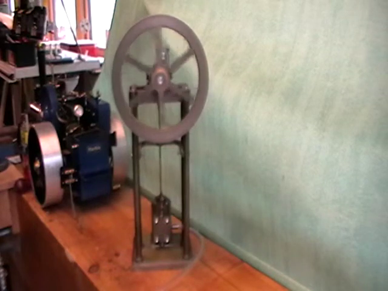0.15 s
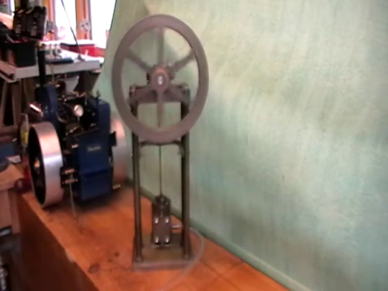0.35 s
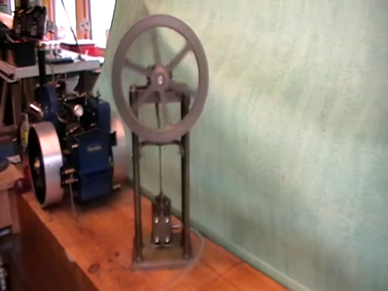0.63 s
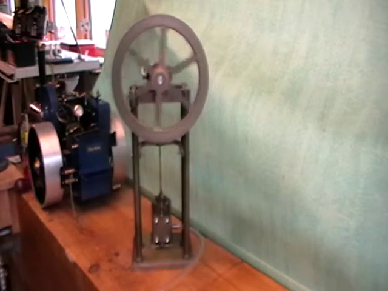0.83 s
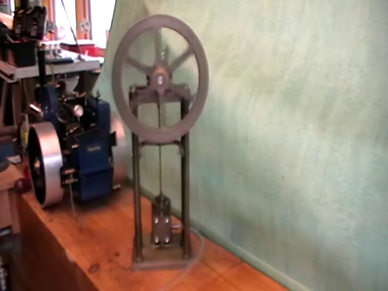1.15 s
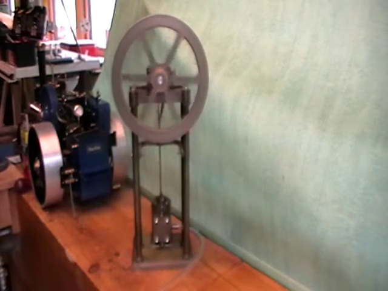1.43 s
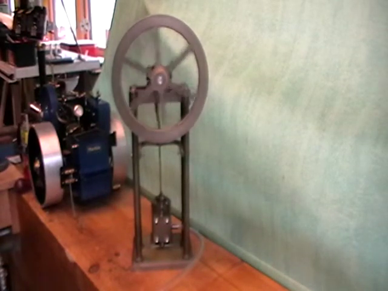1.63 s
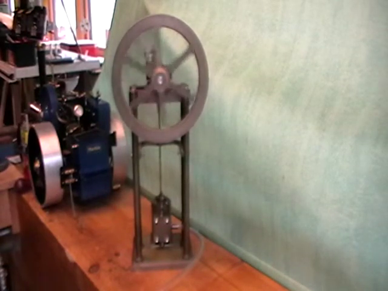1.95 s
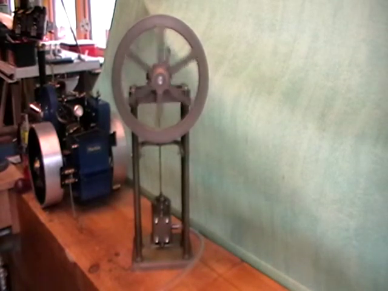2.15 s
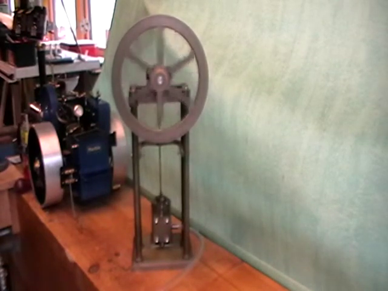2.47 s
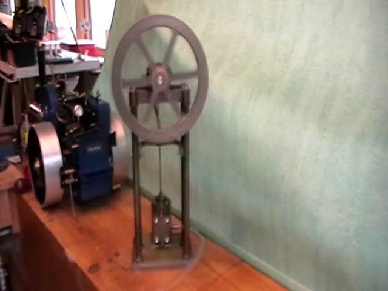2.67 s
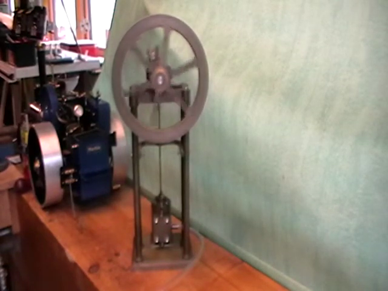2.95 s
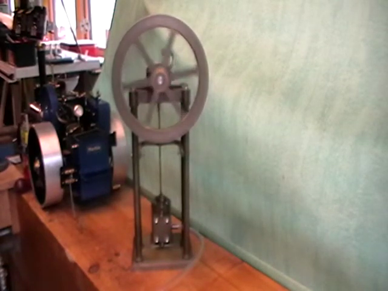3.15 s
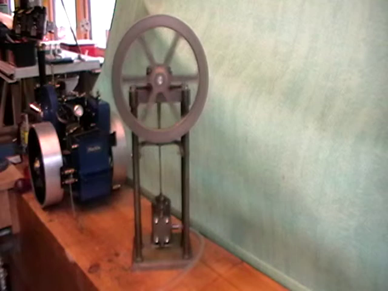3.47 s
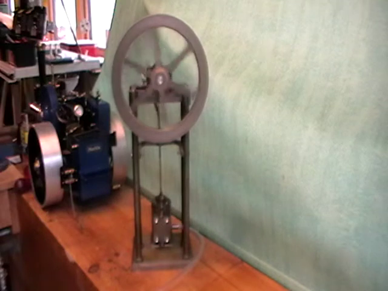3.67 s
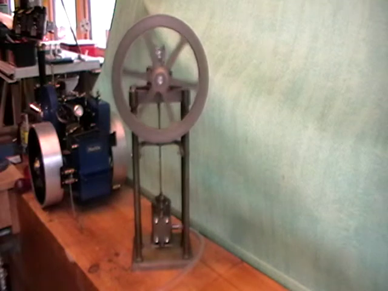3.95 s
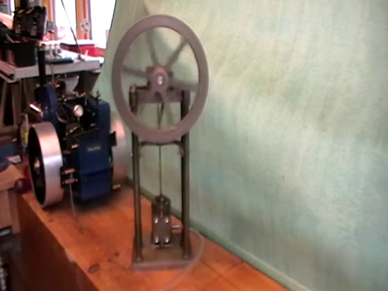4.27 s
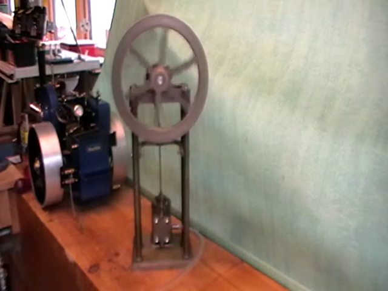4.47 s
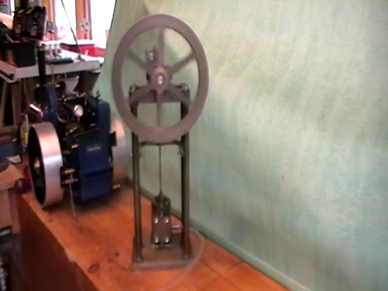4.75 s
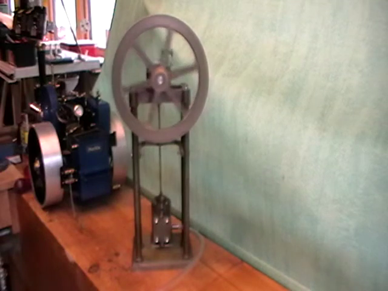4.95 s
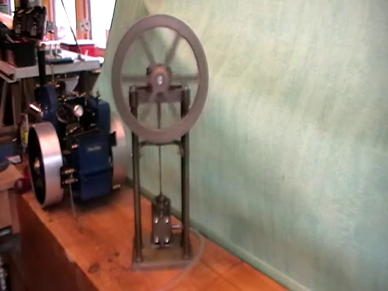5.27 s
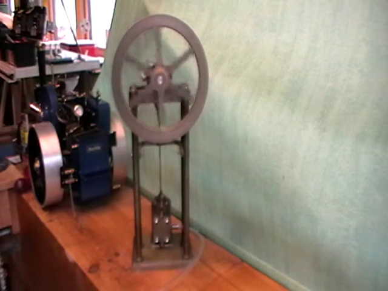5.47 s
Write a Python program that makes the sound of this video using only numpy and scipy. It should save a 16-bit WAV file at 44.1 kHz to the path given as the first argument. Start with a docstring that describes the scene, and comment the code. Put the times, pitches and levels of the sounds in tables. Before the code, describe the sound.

A small vertical flywheel engine runs on compressed air on a wooden bench, about one turn a second. Bright hiss swells and dips in two differing strokes, with a knock at each end. Just after one second a hard object clatters loudly and settles quickly; then only the engine continues. Close stereo microphone, small fairly dry workshop.

```python
"""A small vertical model steam engine turns about once a second on compressed air, on a workshop bench.
Its hiss is shaped noise gated by crank angle, one port per stroke; the exhaust pipe is resonant noise.
The slack rod bearing knocks near both dead centres, exciting decaying modes and noise bursts.
Flywheel bearings rumble and moan, the bench hums, the slide valve scrapes and the crosshead rubs.
Once, a hard object clatters loudly nearby: a series of blows, each with a rebound."""
import sys
import numpy as np
from scipy import signal
from scipy.fft import rfft, irfft, next_fast_len
from scipy.io import wavfile
from scipy.ndimage import map_coordinates

SR = 44100
rng = np.random.default_rng(int(sys.argv[2]) if len(sys.argv) > 2 else 0)


def wrap_up_sound(samples):
    """Save the sound to the file named by the first command line argument, as 16-bit audio."""
    columns = np.atleast_2d(samples).T
    # keep every value between -1 and 1, then stretch to whole-number steps
    tamed = np.clip(columns, -1, 1)
    steps = np.round(tamed * 32767).astype(np.int16)
    wavfile.write(sys.argv[1], SR, steps)


N = 247401

# Decibel columns are relative: the sources add their own gains.
# Dead centres of the crank, top and bottom in turn, half a revolution apart: time_s
DEAD_CENTRE_TIMES = [-.8, -.34, .211, .665, 1.2, 1.659, 2.192, 2.623, 3.135, 3.565, 4.054, 4.472, 4.953,
                     5.36, 5.85]
# Air flow through the up-stroke port over one revolution from top dead centre: turn, level_db
UP_PORT_FLOW = [(0, 0), (.05, 0.5), (.12, 2), (.27, 1.5), (.42, -0.5), (.48, -2), (.55, -19), (.7, -44),
                (.87, -21), (.9, -5.5), (.92, 2.5), (.96, 1.5)]
# Air flow through the down-stroke port: turn, level_db
DOWN_PORT_FLOW = [(.1, -20), (.47, -34), (.51, 0), (.56, -2), (.63, 1), (.67, -1.5), (.73, -8), (.8, -14.5),
                  (.87, -4), (.95, -21)]
# Air flow through the exhaust pipe: turn, level_db
EXHAUST_FLOW = [(0, -9), (.05, -11), (.12, -2.5), (.38, 0), (.42, -7), (.47, 4.5), (.52, -3.5), (.65, 0),
                (.76, -6), (.84, -10.5), (.875, 2), (.93, 3), (.97, -24)]
# Broad spectrum of the up-stroke hiss: frequency_hz, density_db
UP_HISS_SPECTRUM = [(200, -21), (700, -11), (1450, -12.5), (2000, -6.5), (3100, -5.5), (3950, -6),
                    (4900, 0.5), (7200, -1.5), (8200, 1.5), (9900, -2.5), (11700, -2.5), (12050, -4),
                    (13000, -6.5), (15000, -17)]
# Broad spectrum of the down-stroke hiss: frequency_hz, density_db
DOWN_HISS_SPECTRUM = [(300, -14), (750, -9.5), (1400, -13), (2700, -8.5), (4000, -10.5), (5500, -8),
                      (7200, -9), (8600, -1.5), (9300, -2), (10400, -5.5), (11500, -2), (12100, -17),
                      (13200, -21), (15000, -29)]
# Broad spectrum of the gland leak: frequency_hz, density_db
LEAK_SPECTRUM = [(700, -12), (1500, -21.5), (2000, -6), (3400, -5), (3950, -12), (5500, 0.5), (7200, -3),
                 (8100, 1), (9500, -4.5), (12300, -8.5), (13200, 0), (14000, -10.5), (15000, -7.5),
                 (15700, -30)]
# Resonances of the up-stroke port: centre_hz, width_hz, level_db
UP_PORT_RESONANCES = [(8260, 630, -4), (10400, 440, 0.5)]
# Resonances of the down-stroke port: centre_hz, width_hz, level_db
DOWN_PORT_RESONANCES = [(6450, 560, 0), (8600, 400, -7)]
# Resonances of the exhaust pipe: centre_hz, width_hz, level_db
PIPE_RESONANCES = [(2229, 52, 11), (2373, 180, 3.5), (2520, 150, -14)]
# Load on the flywheel bearings over one revolution: turn, level_db
BEARING_LOAD_CYCLE = [(.05, 1.5), (.15, -1.5), (.39, -0.5), (.44, 3), (.5, 2.5), (.6, 0), (.85, 0),
                      (.9, 3.5), (.95, -3.5)]
# Broad spectrum of the bearing rumble: frequency_hz, density_db
RUMBLE_SPECTRUM = [(22, -14), (35, 4), (70, -5.5), (100, -2), (160, 1), (260, -5), (370, -3.5), (600, -6.5),
                   (900, -13), (2000, -14.5), (5000, -60)]
# Resonances of the flywheel bearings: centre_hz, width_hz, level_db
MOAN_RESONANCES = [(347.5, 17, 7), (385, 25, -14)]
# Course of the bearings' moan: time_s, level_db
MOAN_COURSE = [(0.0, -58), (0.63, -54.5), (0.78, -61), (0.93, -56.5), (2.8, -65), (5.61, -65.5)]
# Resonances of the bench top: centre_hz, width_hz, level_db
BENCH_RESONANCES = [(128.7, 11, 0.5), (164.7, 27, 4.5)]
# Course of the bench's hum: time_s, level_db
HUM_COURSE = [(0.0, -61), (0.63, -53.5), (0.93, -54), (1.05, -61), (1.93, -60), (2.02, -50.5), (2.11, -64),
              (3.04, -50.5), (3.28, -62), (3.7, -48.5), (4.03, -59), (4.21, -43), (4.27, -60),
              (4.45, -48.5), (4.84, -59), (5.61, -50.5)]
# Slack taken up by the rod bearing in every revolution; the last column is added per rev/s above usual:
# turn, click_db, thud_db, ring_db, hardening_db_per_rev_per_s
BEARING_KNOCKS = [(0, -19, -32.3, -34.7, 20), (.436, -27, -50, -47, 0), (.5, -23.5, -37, -36.5, 5),
                  (.886, -35, -50, -54, 0), (.981, -43, -42, -49, 10)]
# Modes of frame and bench: frequency_hz, level_db, t60_s
FRAME_MODES = [(185.3, 2, 0.094), (216, -2, 0.089), (288, -3, 0.18), (336, 2.5, 0.14), (409.4, -5, .13),
               (453.4, -4.5, 0.13), (538.7, 3, 0.12), (586, 4.5, 0.093), (633, -0.5, 0.062),
               (742, -1.5, 0.091), (881, -12, 0.12), (959, -11, 0.13), (1057, -3.5, 0.08), (1083, 0, 0.066),
               (1277, -7.5, 0.065), (1348, -12, 0.095), (1473, -7.5, 0.052), (1536, -3, 0.055),
               (1666, -15, 0.086), (2300, -22, .07), (2700, -28, 0.082), (2980, -16, 0.026)]
# Spectrum of the thud of frame and bench: frequency_hz, density_db
THUD_SPECTRUM = [(71, -41), (120, -13.5), (306, -3), (436, -13.5), (523, -6), (584, -3), (763, -10),
                 (841, -31), (1030, -15), (1200, -28), (1510, -19), (1770, -19), (2200, -51), (2860, -56),
                 (4840, -120)]
# Spectrum of the metal click: frequency_hz, density_db
CLICK_SPECTRUM = [(500, -28), (1100, 0), (1600, -6), (2000, -5), (2600, -4), (3000, -1.5), (3500, -10.5),
                  (6000, -10), (10000, -38)]
# Scrapes of the slide valve as it reverses, in every revolution: turn, level_db
VALVE_REVERSALS = [(.438, -40.5), (.474, -41.5), (.92, -35.5)]
# Resonances of the scraping valve: centre_hz, width_hz, level_db
VALVE_RESONANCES = [(1840, 270, -9.5), (2430, 200, 2.5), (3250, 440, -10.5), (4340, 310, -12)]
# Rubs of the crosshead on its guide: centre_s, level_db, half_length_s
CROSSHEAD_RUBS = [(.31, -48, .012), (0.598, -47, 0.033)]
# Resonances of the guide: centre_hz, width_hz, level_db
GUIDE_RESONANCES = [(1200, 250, 2), (1660, 250, -6)]
# Blows of the clatter: start_s, thump_db, ring_db, crack_db, fizz_db
CLATTER_BLOWS = [(1.12, -23, -22.5, -25, -27), (1.145, -36, -22.5, -18, -24.5),
                 (1.151, -27, -17.5, -20, -24.5), (1.186, -31, -22, -33, -28),
                 (1.213, -26, -26.5, -32.5, -31.5), (1.252, -25.5, -20, -23, -20.5),
                 (1.27, -26.5, -21.5, -28.5, -30)]
# Modes of the clattering object: frequency_hz, level_db, t60_s
OBJECT_MODES = [(173.2, -4, 0.45), (221, -11, 0.38), (406, -5.5, 0.33), (1094, -8, 0.27), (1114, -10, .18),
                (1308, -16, 0.4), (1449, -9, 0.13), (1503, 0, 0.23), (1558, 0, 0.15), (1687, -2, 0.16),
                (2173, 1.5, 0.11), (2670, -18, 0.14), (2940, -17, .11), (3080, -25, .11), (3460, -16, .11)]
# Broad spectrum of the clatter: frequency_hz, density_db
CRASH_SPECTRUM = [(26, -39), (45, 0), (97, -9), (175, 0), (360, 0.5), (405, 2), (477, -1), (836, -8),
                  (1080, -3), (1530, -3), (1810, -3), (2820, -4.5), (4000, -12), (6850, -19), (12000, -30),
                  (15600, -57), (22000, -120)]
# Treble spectrum of the clatter: frequency_hz, density_db
FIZZ_SPECTRUM = [(4400, -50), (4800, 0), (6800, 0.5), (8200, -4.5), (10500, -7.5), (12500, -37),
                 (15000, -60)]
# Likeness of the left and right noise: frequency_hz, correlation
STEREO_LIKENESS = [(40, 0.84), (200, 0.97), (1000, 0.79), (2300, 0.98), (4000, 1), (4800, 1), (7500, 1),
                   (10500, 0.87), (13000, 0.53)]
# Reverberation time of the workshop: frequency_hz, t60_s
ROOM_DECAY = [(150, 0.4), (500, 0.067), (1500, 0.15), (4000, 0.19), (10000, 0.23)]
# Stereo width of the reverberation: frequency_hz, side_over_mid_db
ROOM_SPREAD = [(400, -6), (1000, -2), (2500, 2.5), (8000, 1)]

# the down port's pitch rises up to this turn of each revolution, then holds
PORT_RISE_PER_TURN, PORT_RISE_END_TURN = .16, .62
HUM_HZ, HUM_WANDER_HZ = 168.7, 7
USUAL_REV_PER_S = 1.07
SCRAPE_SCATTER_DB = 1.4  # from one revolution to the next
BOUNCE_S, BOUNCE_LOSS_DB = .011, 7  # delay and weakening of each rebound
AT_REST_S, CHOKE_DB_PER_S = 1.269, 220  # once the object lies flat, its ringing is choked
HIGH_PASS_HZ, TOP_HZ = 27, 15820


def amp(db):
    """Amplitude gain is ten to the power of decibels over twenty."""
    return 10 ** (np.asarray(db) / 20)


def unit(x):
    """Normalisation divides a signal by its root mean square."""
    return x / np.sqrt(np.mean(x ** 2) + 1e-20)


def along(points, hz):
    """Values between (frequency, value) points are linear in log frequency."""
    f, v = np.transpose(points)
    return np.interp(np.log(hz + 1), np.log(f + 1), v)


def colour(points):
    """A broad spectrum is a smooth gain against frequency."""
    return lambda hz: amp(along(points, hz))


def resonant(peaks):
    """Each resonance is a peak whose amplitude halves 0.71 widths from its centre."""
    def response(hz):
        return sum(amp(db) / (1 + ((hz - centre) / (width * 0.71)) ** 2) for centre, width, db in peaks)
    return response


def filtered(x, response):
    """Linear filtering multiplies the spectrum by a frequency response."""
    n = x.shape[-1]
    m = next_fast_len(n + SR // 4)
    spectrum = rfft(x, m) * response(np.fft.rfftfreq(m, 1 / SR))
    return irfft(spectrum, m)[..., :n]


def noise(response, size=N):
    """Partly correlated stereo noise of rms 1: the mid-to-side ratio sets the likeness at each frequency."""
    def mid_side_response(hz):
        angle = np.arccos(np.clip(along(STEREO_LIKENESS, hz), 0, .998)) / 2
        return response(hz) * np.array([np.cos(angle), np.sin(angle)])
    mid, side = filtered(rng.standard_normal((2, size)), mid_side_response)
    return unit(np.array([mid + side, mid - side]))


def wobble(rate):
    """A smooth random modulation is a spline through random knots, rate of them a second."""
    knots = rng.standard_normal(int(N * rate / SR) + 4)
    return map_coordinates(knots, [np.arange(N) * rate / SR])


def dying(t, t60, attack):
    """A damped vibration rises quickly and falls exponentially, 60 dB in t60 seconds."""
    return amp(-60 * t / t60) * (1 - np.exp(-t / attack))


def add(track, s, sound):
    """Superposition sums a sound into the track at time s."""
    part = track[:, round(s * SR):][:, :sound.shape[-1]]
    part += sound[..., :part.shape[1]]


def curve(rows):
    """A slow course is linear between its (time, value) rows."""
    return np.interp(np.arange(N) / SR, *np.transpose(rows))


def crank():
    """Crank angle in revolutions advances by half a turn between dead centres."""
    return np.interp(np.arange(N) / SR, DEAD_CENTRE_TIMES, np.arange(len(DEAD_CENTRE_TIMES)) / 2)


def passes(turn):
    """Each revolution passes a given crank angle once: its (time in s, speed in rev/s)."""
    turns = np.arange(len(DEAD_CENTRE_TIMES)) / 2
    at = np.arange(turns[-1]) + turn
    s = np.interp(at, turns, DEAD_CENTRE_TIMES)
    speed = np.interp(at, turns, .5 / np.gradient(DEAD_CENTRE_TIMES))
    return zip(s[s > 0], speed[s > 0])


def per_turn(points):
    """Periodic modulation: a (turn, dB) pattern repeats with the crank."""
    turn, db = np.transpose(points)
    return amp(np.interp(crank(), turn, db, period=1))


def glide(x, ratio):
    """Reading a sound at a varying rate scales its pitch by that ratio."""
    position = np.cumsum(ratio)
    return np.array([map_coordinates(channel, [position], mode='mirror') for channel in x])


def wall(x, wet_db, count=40):
    """Interference: close echoes from the wall and bench beside the engine comb the hiss."""
    delay = rng.uniform(.001, .014, count)  # seconds
    strength = rng.standard_normal(count) * np.exp(-delay / 0.0082)
    echoes = np.bincount((delay * SR).astype(int), strength)
    echoes = echoes[None] / np.linalg.norm(echoes)
    return x + amp(wet_db) * signal.fftconvolve(x, echoes, axes=1)[:, :N]


def air():
    """Turbulent jets make noise: each stroke has its own port, the pipe resonates and the gland leaks."""
    up_hiss = amp(-42.0) * noise(colour(UP_HISS_SPECTRUM))
    up_whistle = amp(-46.0) * noise(resonant(UP_PORT_RESONANCES))
    up = per_turn(UP_PORT_FLOW) * (up_hiss + up_whistle)

    before_end = np.minimum(crank() % 1 - PORT_RISE_END_TURN, 0)
    pitch_ratio = 1 + PORT_RISE_PER_TURN * before_end + .008 * wobble(12)
    down_hiss = amp(-45.5) * noise(colour(DOWN_HISS_SPECTRUM))
    down_whistle = amp(-45.5) * glide(noise(resonant(DOWN_PORT_RESONANCES)), pitch_ratio)
    down = per_turn(DOWN_PORT_FLOW) * (down_hiss + down_whistle)

    flutter = amp(1.3 * wobble(45))
    pipe = per_turn(EXHAUST_FLOW) * flutter * amp(-48) * noise(resonant(PIPE_RESONANCES))
    sputter = amp(0.65 * wobble(4.87) + 0.45 * wobble(80))  # oil in the ports makes the flow uneven
    leak = amp(-44.5) * noise(colour(LEAK_SPECTRUM))
    return wall((up + down) * sputter + leak, wet_db=-7.5) + pipe


def rumble():
    """Rolling contact: bearings rumble with their load and moan at resonance, and the bench top hums."""
    hum_phase = 2 * np.pi * np.cumsum(HUM_HZ + HUM_WANDER_HZ * wobble(35)) / SR
    tone = amp(-1.5 + 3 * wobble(20)) * np.sin(hum_phase)
    hum = amp(curve(HUM_COURSE) + .3) * (tone + amp(-5) * noise(resonant(BENCH_RESONANCES)))
    bearings = amp(-52.5) * per_turn(BEARING_LOAD_CYCLE) * noise(colour(RUMBLE_SPECTRUM))
    moan = amp(curve(MOAN_COURSE) - 2.0) * noise(resonant(MOAN_RESONANCES))
    return bearings + moan + hum


def knocks():
    """Impact excitation: the bearing clicks, frame and bench thud and ring, and gentle blows are duller."""
    out, t = np.zeros((2, N)), np.arange(SR // 3) / SR
    hz, db, t60 = np.transpose(FRAME_MODES)[:, :, None]
    phase = rng.random(hz.shape)  # shared: the blow always lands on the same spot
    modes = dying(t, t60, attack=2.04 / hz) * np.sin(2 * np.pi * (hz * t + phase))
    for turn, *levels_db, hardening_db in BEARING_KNOCKS:
        for s, speed in passes(turn):
            excess_db = hardening_db * (speed - USUAL_REV_PER_S)
            click_db, thud_db, ring_db = np.array(levels_db) + excess_db
            soft_db = .4 * min(thud_db + 35, 0)  # zero for hard blows, negative for gentle ones
            # the thud drives the low modes, the ring the upper ones
            strength_db = np.where(hz < 900, thud_db + 0.44, ring_db + soft_db + 4.5)
            strength_db = strength_db + rng.normal(0, 1.6, hz.shape)
            add(out, s, np.sum(amp(db + strength_db) * modes, axis=0))

            thud = dying(t, t60=0.21, attack=0.0087) * noise(colour(THUD_SPECTRUM), size=len(t))
            add(out, s, amp(thud_db - 3.5) * thud)
            click = dying(t, t60=0.052, attack=0.0019) * noise(colour(CLICK_SPECTRUM), size=len(t))
            add(out, s, amp(click_db + soft_db - 11) * click)
            # the frame rocks back on its foot with a dull second bump
            bump = dying(t, t60=0.072, attack=0.01) * noise(resonant([(600, 190, 0)]), size=len(t))
            add(out, s + 0.011, amp(thud_db + soft_db + 7.0) * bump)
    return out


def scrapes():
    """Dry friction: the slide valve rasps as it reverses, a short gritty swell that breaks off."""
    out, t = np.zeros((2, N)), np.arange(SR // 6) / SR
    lead = .03  # seconds from the start of the swell to its peak
    swell = amp(np.minimum(400 * (t - lead), -600 * (t - lead)))  # slopes in dB/s
    for turn, db in VALVE_REVERSALS:
        for s, _ in passes(turn):
            level_db = db - 3.5 + SCRAPE_SCATTER_DB * rng.standard_normal()
            rasp = swell * noise(resonant(VALVE_RESONANCES), size=len(t))
            add(out, s + .005 - lead, amp(level_db) * rasp)
    grit = amp(2.4 * wobble(400))
    return out * grit


def rubs():
    """Sliding friction: the crosshead chafes on its guide in faint, scratchy swells."""
    t = np.arange(N) / SR
    contact = sum(amp(db) * np.exp(-((t - s) / half) ** 2) for s, db, half in CROSSHEAD_RUBS)
    scratch = amp(2.5 * wobble(150.3))
    return contact * scratch * noise(resonant(GUIDE_RESONANCES))


def clatter():
    """Repeated impact: each blow of a hard object and its rebound thump, ring and crack until it settles."""
    out, ringing, t = np.zeros((2, N)), np.zeros((2, N)), np.arange(SR // 2) / SR

    def band(lo_hz, hi_hz):
        """Band limitation keeps one slice of the crash spectrum."""
        return noise(lambda hz: colour(CRASH_SPECTRUM)(hz) * (hz > lo_hz) * (hz < hi_hz), size=len(t))

    def mode(hz, db, t60):
        """A free mode is a damped sine, its level and phase scattered from blow to blow."""
        level = amp(db + rng.normal(0, 1))
        return level * dying(t, t60, attack=.0015) * np.sin(2 * np.pi * (hz * t + rng.random()))

    for start, *levels_db in CLATTER_BLOWS:
        for rebound in range(2):
            s = start + rebound * BOUNCE_S
            thump_db, ring_db, crack_db, fizz_db = np.array(levels_db) - rebound * BOUNCE_LOSS_DB
            ring = sum(mode(*row) for row in OBJECT_MODES)
            add(ringing, s, amp(ring_db - 9.5) * ring)
            add(out, s, amp(thump_db - 4.0) * dying(t, t60=0.17, attack=0.00088) * band(43, 800))
            add(out, s, amp(ring_db - 4.5) * dying(t, t60=0.12, attack=0.00064) * band(800, 2500))
            add(out, s, amp(crack_db - 1.5) * dying(t, t60=0.14, attack=0.0012) * band(2500, 4700))
            fizz = dying(t, t60=0.14, attack=0.00087) * noise(colour(FIZZ_SPECTRUM), size=len(t))
            add(out, s, amp(fizz_db - 3) * fizz)
            # a very brief tick at contact
            add(out, s, amp(ring_db + 3.5) * dying(t, t60=0.0056, attack=0.00014) * band(1000, 8000))
    chatter = amp(1.8 * wobble(220))  # the edges rattle against the surface
    resting_s = np.clip(np.arange(N) / SR - AT_REST_S, 0, 1)
    return out * chatter + ringing * amp(-CHOKE_DB_PER_S * resting_s)


def room(x):
    """Reverberation is decaying diffuse noise, narrow in the bass and wide in the treble."""
    hz, t, z = signal.stft(rng.standard_normal((2, SR // 2)), SR, nperseg=256)
    z = z * amp(-60 * t / along(ROOM_DECAY, hz)[:, None])
    spread = colour(ROOM_SPREAD)(hz)[:, None]
    mid, side = signal.istft(np.array([z[0], z[1] * spread]), SR, nperseg=256)[1]
    tail = np.array([mid + side, mid - side]) / (np.sqrt(2) * np.linalg.norm(mid))
    return signal.fftconvolve(x, tail, axes=1)[:, :N]


def scene():
    """Direct and reverberant sound add; the clatter wakes more of the workshop than the engine."""
    engine = knocks() + scrapes() + rubs()
    crash = clatter()
    reverberation = room(amp(-17.5) * engine + amp(-13.5) * crash)
    return air() + rumble() + engine + crash + reverberation


def record(dry):
    """Band limitation thins the deepest bass and keeps nothing from TOP_HZ upwards."""
    return filtered(dry, lambda hz: (hz < TOP_HZ) * hz ** 4 / (hz ** 4 + HIGH_PASS_HZ ** 4))


dry = scene()
out = record(dry)
wrap_up_sound(out)
```